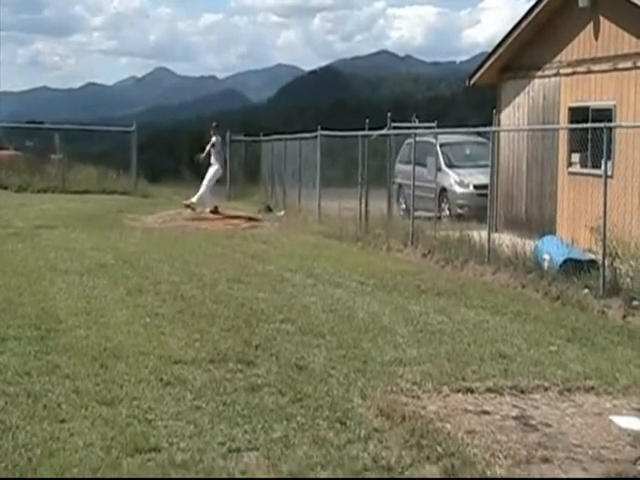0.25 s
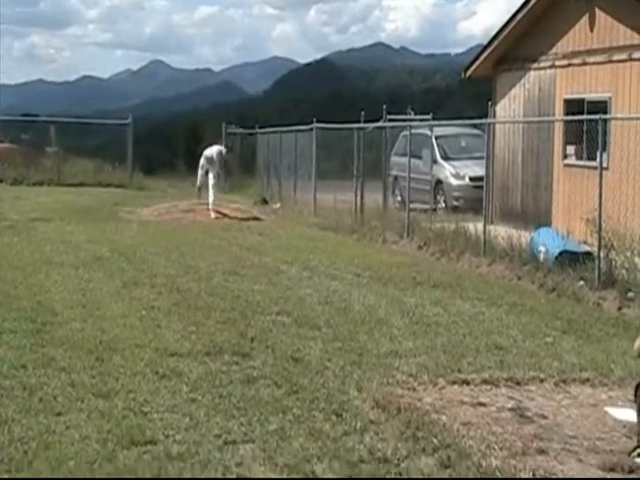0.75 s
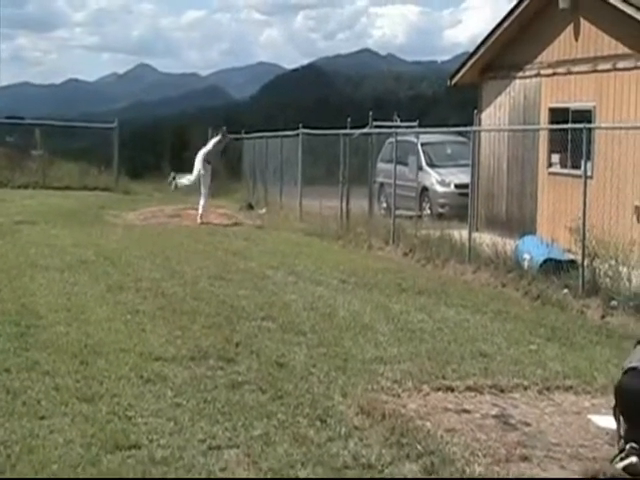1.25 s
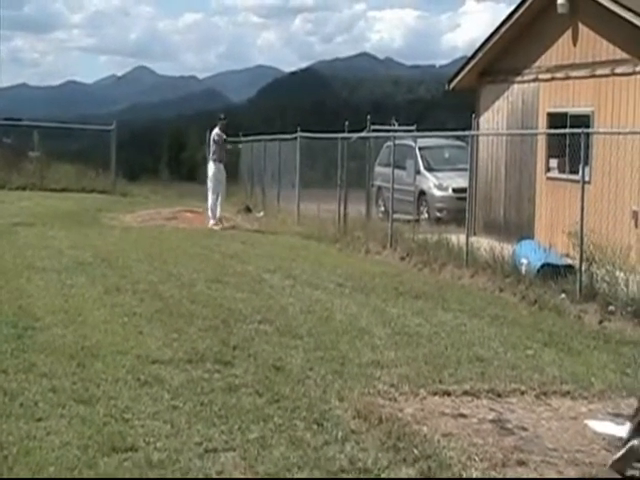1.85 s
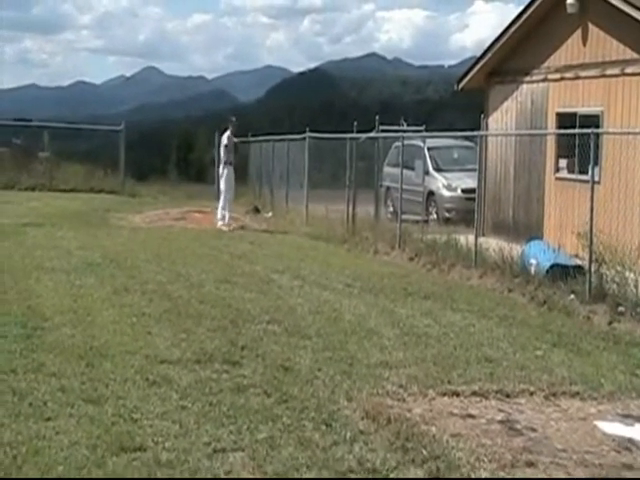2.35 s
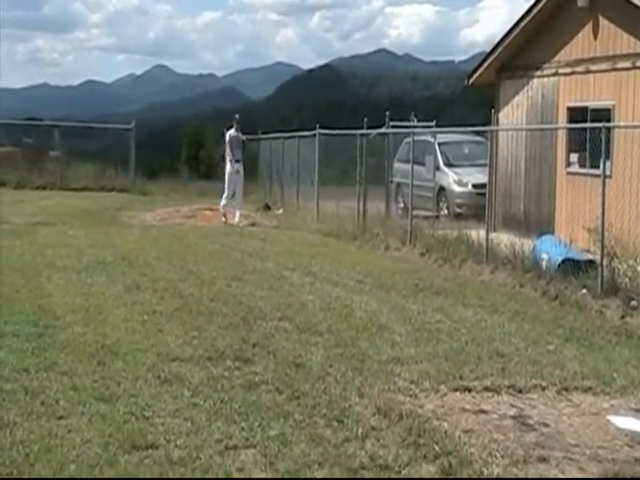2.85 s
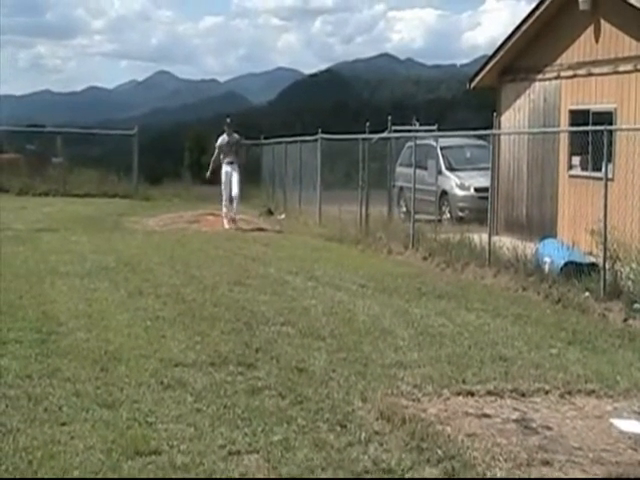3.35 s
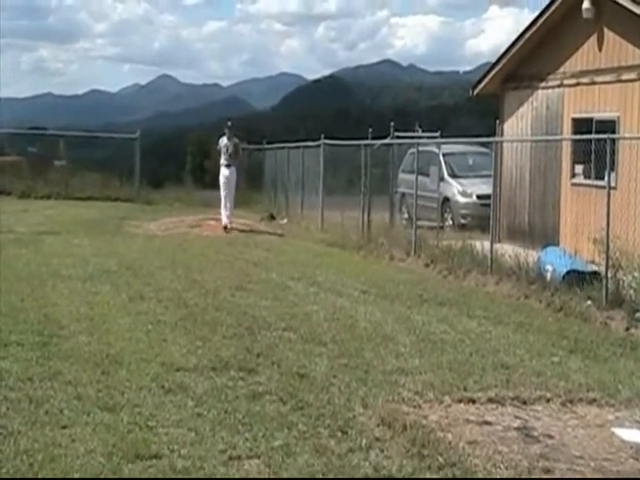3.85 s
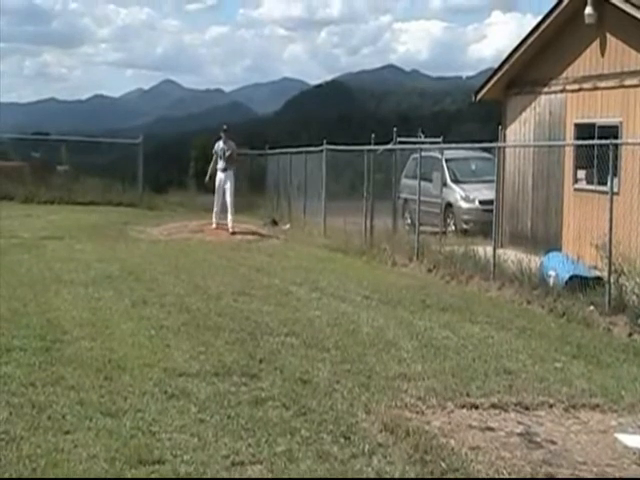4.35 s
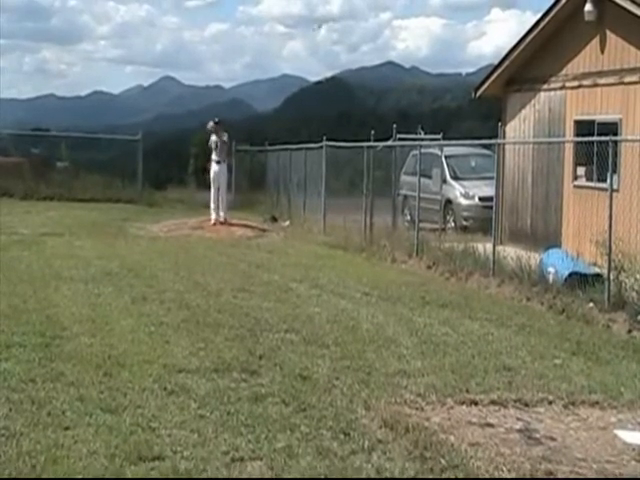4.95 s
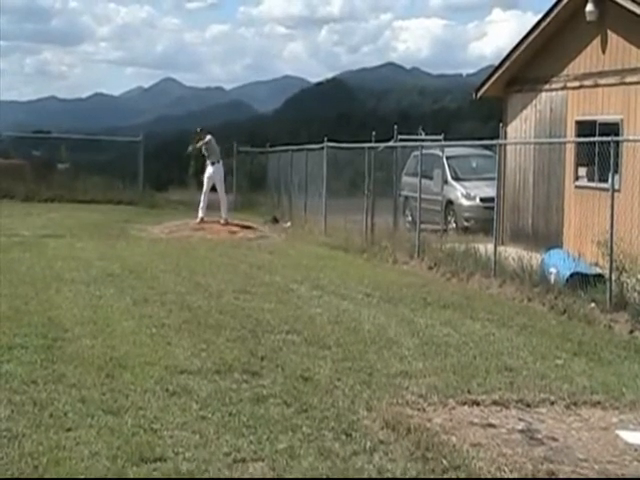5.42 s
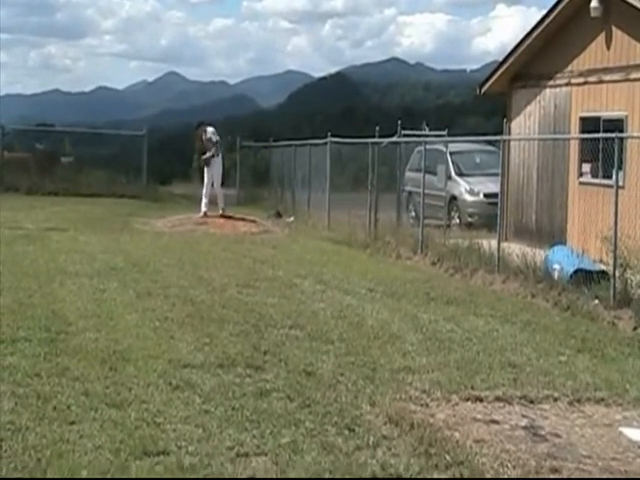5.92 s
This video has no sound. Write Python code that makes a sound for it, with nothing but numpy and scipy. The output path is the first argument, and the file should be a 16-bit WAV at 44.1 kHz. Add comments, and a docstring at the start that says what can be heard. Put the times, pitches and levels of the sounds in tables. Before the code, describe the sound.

An open field in a light breeze, heard on a small camera's slightly dull stereo microphone. From the start a distant engine hums steadily around a low-mid pitch, creeping upward, with thin high cricket trills and a fine ticking insect behind it. A faint scuff comes at 0.85 s. At 1.28 s a ball smacks into a leather mitt close by, very loud and full, with a sharp crack and a short scattered tail; crackling leather and gear snaps run until about 1.45 s. Soft shuffles and rustles follow at 1.7, 2.0 and 3.8 s, with low wind gusts, strongest near 2 s. From about 3 s the drone grows and pulses in slow beats. At 5.6 s a drier, tighter glove pop is doubled immediately by a wall slap. Around 6 s the engine lets off, its pitch sinking, and a soft low knock at 6.14 s, on the left, closes.

```python
"""On a country field, a pitched ball pops into a catcher's mitt: thumping modes, noise crack, scattered tail.
Leather and gear crackle in decaying bursts as the catcher rises; a drier glove pop meets a shed-wall slap.
A far engine drones as a beating sine with faint exhaust lines, slowly speeds up and lets off.
Crickets trill as trains of bent tone bursts; shaped noise makes the shuffles, and the breeze on two ports.
A soft knock of damped modes ends the scene."""
import sys
import numpy as np
from scipy.fft import rfft, irfft, next_fast_len
from scipy.io import wavfile
from scipy.ndimage import map_coordinates

SR = 44100
rng = np.random.default_rng(int(sys.argv[2]) if len(sys.argv) > 2 else 0)


def waveform_to_disk(signal):
    """Save audio, clipped to [-1, 1], as 16-bit WAV at the path in sys.argv[1]."""
    frames = np.transpose(np.atleast_2d(signal))
    scaled = np.clip(frames, -1, 1) * 32767
    samples = np.round(scaled).astype(np.int16)
    wavfile.write(sys.argv[1], SR, samples)


N = 272755


def amp(db):
    """Level to amplitude: 20 dB is a factor of ten."""
    return 10 ** (np.asarray(db) / 20)


def unit(x):
    """Normalize the signal power: scale to rms 1."""
    return x / np.sqrt(np.mean(x ** 2) + 1e-20)


def clock():
    """Uniform sampling: the time of every sample in seconds."""
    return np.arange(N) / SR


def curve(rows):
    """Linear interpolation of (time [s], value) rows."""
    times, values = np.transpose(rows)
    return np.interp(clock(), times, values)


def along(points, hz):
    """Interpolation of (frequency [Hz], value) points on a logarithmic frequency axis."""
    f, v = np.transpose(points)
    return np.interp(np.log(hz + 1), np.log(f), v)


def wobble(rate):
    """Band-limited fluctuation: a smooth curve through random knots, rate of them a second."""
    knots = rng.standard_normal(int(N * rate / SR) + 4)
    return map_coordinates(knots, [clock() * rate])


def filtered(x, response):
    """Linear filtering: the spectrum is multiplied by a zero-phase frequency response."""
    size = next_fast_len(x.shape[-1] + 8192)  # padding limits wrap-around
    hz = np.fft.rfftfreq(size, 1 / SR)
    return irfft(rfft(x, size) * response(hz), size)[..., :x.shape[-1]]


def bell(hz, centre_hz, octaves):
    """Resonance-shaped hump on a log-frequency axis, at half height the given octaves from its centre."""
    return 1 / (1 + (np.log2((hz + 1) / centre_hz) / octaves) ** 2)


def noise(spectrum, side):
    """Mid-side stereo noise of rms 1: (frequency [Hz], level [dB]) for colour, then for side over mid."""
    mid, wide = filtered(rng.standard_normal((2, N)), lambda hz: amp(along(spectrum, hz)))
    wide = filtered(wide, lambda hz: amp(along(side, hz)))
    return unit(np.array([mid + wide, mid - wide]))


def panned(x, left_db):
    """Level-difference localization: left_db is the level of left over right."""
    return x * amp([[left_db / 2], [-left_db / 2]])


def add(track, s, sound):
    """Superposition: sum a short sound into the track at time s."""
    part = track[round(s * SR):][:len(sound)]
    part += sound[:len(part)]


def thump(modes):
    """Modal impact: each mode swells while the contact lasts and is choked as it ends."""
    t = np.arange(SR // 20) / SR
    out = np.zeros(len(t))
    for hz, db, swell in modes:
        envelope = t / swell * np.exp((1 - (t / swell) ** 2) / 2)  # peaks at 1 when t = swell
        out += amp(db) * envelope * np.sin(2 * np.pi * hz * t)
    return out


def burst(t60, attack):
    """Transient envelope: a fast rise and an exponential decay of 60 dB in t60 seconds."""
    t = np.arange(SR // 4) / SR
    return (1 - np.exp(-t / attack)) * np.exp(-np.log(1000) * t / t60)


def beating():
    """Interference: gain of two close tones that drift in and out of step, ever more slowly."""
    # share of the second tone: (time [s], amplitude ratio [0-1])
    beat_depth = [(2.3, 0.01), (4.1, 0.56), (5.25, 0.7), (5.8, 0.08)]
    null_s, null_hz, slowing_hz_per_s = 5.25, 1.53, .32  # deepest dip, beat rate there, its decline
    t = clock() - null_s
    beats = null_hz * t - slowing_hz_per_s * t ** 2 / 2
    return np.abs(1 - curve(beat_depth) * np.exp(2j * np.pi * beats))


def engine():
    """Periodic combustion: a firing tone beats as it grows, and uneven cylinders add wavering lines."""
    # engine speed: (time [s], firing rate [Hz])
    engine_speed = [(0, 142.3), (1.3, 146.5), (2.5, 150.8), (3.6, 153.8), (4.7, 155.9), (5.93, 157.3),
                    (6.02, 147.5), (6.07, 132.2), (6.18, 107.7)]
    # drone before flutter and beating: (time [s], level [dB])
    engine_level = [(0, -31.5), (.4, -25), (1.6, -26), (2.3, -24.5), (2.6, -30), (3.55, -28), (4.35, -22),
                    (5, -20.5), (6.02, -24), (6.1, -34)]
    # faint exhaust lines: (multiple of the firing rate, level before load [dB], left over right [dB])
    exhaust = [(.5, -46, -0.5), (.75, -40, -2), (1.25, -44, -1), (1.5, -48.5, 3), (1.75, -47.5, 1),
               (2, -59, -1), (3.25, -59, 3.5), (6.25, -65.5, -3), (6.75, -62.5, -7.5)]
    # engine load heard on those lines: (time [s], gain [dB])
    engine_load = [(0, -3), (2.1, -3), (2.9, -2.5), (4.8, 1.5), (5.4, -10.5), (6.18, -19)]
    flutter_db = 0.72  # moving air makes the far drone unsteady
    phase = 2 * np.pi * np.cumsum(curve(engine_speed)) / SR
    swell = amp(curve(engine_level) + flutter_db * wobble(28)) * beating()
    out = panned(swell * unit(np.sin(phase)), left_db=-0.64)
    for order, db, left_db in exhaust:
        order = round(order * 4) / 4  # lines lie on quarter multiples
        tone = np.sin(order * phase + 1.1 * wobble(7))
        line = unit(amp(3.0 * wobble(6)) * tone)
        out += panned(amp(db + curve(engine_load)) * line, left_db)
    return out


def wing_strokes(rate, scatter, length, top_hz, crest, droop, size_db, port_phase):
    """Stridulation: each stroke scrapes a tone on a pitch arch topped at crest, sagging as the wing slows."""
    u = np.linspace(0, 1, int(length * SR))  # progress through a stroke; length in seconds
    pitch = top_hz * (1 - droop * (u - crest) ** 2)
    song = np.zeros(N, complex)
    strokes = rng.standard_normal((int(rate * N / SR) + 1, 3))
    for k, (late, size, detune) in enumerate(strokes):
        phase = 2 * np.pi * np.cumsum(pitch * (1 + .002 * detune)) / SR
        stroke = amp(size_db * size) * np.sin(np.pi * u) * np.exp(1j * phase)
        start = max(0, (k + .5 + scatter * late) / rate)
        add(song, start, stroke)
    # such short waves reach the two ports out of step
    shifted = song * np.exp(1j * port_phase)
    return unit(np.array([song.real, shifted.real]))


def bouts():
    """Amplitude modulation: the bush cricket swells about once a second, unevenly, and rests once."""
    level_db, swing_db = -63, 1.5
    peak_s, period_s = 3.96, 1
    rest_s, rest_spread_s, rest_db = 0.68, .13, -19
    swell = swing_db * np.cos(2 * np.pi * (clock() - peak_s) / period_s)
    rest = rest_db * np.exp(-((clock() - rest_s) / rest_spread_s) ** 2 / 2)
    return amp(level_db + swell + rest + 1.4 * wobble(5.6))


def insects():
    """Stridulating sources: two crickets trill at unlike rates over a far chorus; a bush cricket ticks."""
    near = wing_strokes(rate=18.52, scatter=.012, length=.02, top_hz=8785,
                        crest=.42, droop=.1, size_db=1, port_phase=1.9)
    far = wing_strokes(rate=17.8, scatter=.05, length=.026, top_hz=8420,
                       crest=.3, droop=.13, size_db=2.5, port_phase=1.6)
    # a crest before the stroke begins makes the pitch only fall
    ticks = wing_strokes(rate=61, scatter=0.2, length=0.0069, top_hz=7504,
                         crest=-0.35, droop=.045, size_db=2.5, port_phase=0.91)
    chorus = noise([(6500, -35.5), (7300, -8.5), (8300, 2), (8700, -5.5), (9100, -22),
                    (10500, -31.5), (12000, -44.5)], [(8000, 0.84)])
    crickets = panned(amp(-56.8) * near, left_db=-2) + panned(amp(-62.5) * far, left_db=3)
    return crickets + bouts() * ticks + amp(-62) * chorus


def breeze():
    """Turbulence: a soft rush from the far trees, and low gusty lumps of wind unlike at the two ports."""
    # wind strength at the ports before gusts: (time [s], level [dB])
    wind_level = [(0, -40), (.9, -34), (1.62, -30.5), (1.85, -36), (2.05, -27), (2.55, -37), (2.8, -42),
                  (3.2, -39.5), (3.45, -31.5), (3.96, -51.5), (4.2, -32.5), (5.1, -34), (5.7, -28.5),
                  (6.15, -31)]
    # colour of the wind lumps: (frequency [Hz], relative level per Hz [dB])
    buffet = [(20, -17), (40, -7.5), (80, -5.5), (130, -3.5), (200, -8), (300, -24), (500, -33.5),
              (1200, -63.5)]
    # colour of the rush of trees: (frequency [Hz], relative level per Hz [dB])
    air = [(60, -5.5), (300, 6.5), (430, -0.5), (560, -3.5), (720, 0), (1020, -2), (1200, -6), (1800, -9),
           (2600, -16), (3800, -23), (4500, -21.5), (5700, -29.5), (9000, -22.5), (10800, -37.5),
           (13200, -45)]
    # stereo width of the rush: (frequency [Hz], side over mid [dB])
    air_side = [(200, -2.5), (800, -9), (2000, -9.5), (5000, -4), (9000, -0.5), (13000, -5)]
    field_db, gust_db = -42, 1  # rush level about which it drifts; size of the random gusts
    drift = 0.48 * wobble(8) + 1.5 * wobble(0.97)
    rush = amp(field_db + drift) * noise(air, air_side)
    lumps = noise(buffet, [(30, 1.7), (70, 0.86), (140, 1.4), (250, 0.36)])
    gusts = amp(curve(wind_level) + gust_db * wobble(9))
    return rush + panned(gusts * lumps, left_db=5.5)


def scuffs():
    """Friction noise: each shuffle is a short swell of grain, and fainter rustles come and go at random."""
    # clearest shuffles of shoes, grass and kit:
    # (time [s], level [dB], Gaussian spread [s], brightest frequency [Hz], half width [octaves])
    shuffles = [(0.849, -49.5, 0.012, 2690, 0.88), (1.688, -51, 0.032, 2880, 0.15),
                (2.016, -51, 0.011, 3900, 0.91), (2.313, -57, 0.017, 6440, 1), (2.885, -58, 0.037, 6500, 1),
                (3.323, -62, 0.05, 4440, 0.19), (3.817, -48.5, 0.013, 1790, 0.28),
                (3.888, -60, 0.024, 9400, .4)]
    rustle_db, rustle_swing_db, rustle_hz = -66.5, 2, 4500
    grain = amp(2.5 * wobble(300))
    grit = grain * noise([(8500, 0.5), (11000, -6.5), (13500, -13)], [(1000, -13.5)])

    def rub(bright_hz, octaves):
        """Spectral shaping: the grit is brightest around one frequency."""
        return unit(filtered(grit, lambda hz: bell(hz, bright_hz, octaves)))

    out = amp(rustle_db) * unit(amp(rustle_swing_db * wobble(5)) * rub(rustle_hz, 1))
    for s, db, spread, bright_hz, octaves in shuffles:
        swell = np.exp(-((clock() - s) / spread) ** 2 / 2)
        out += amp(db) * swell * rub(bright_hz, octaves)
    return out


def pop(contacts, modes, crack_t60, tail_db, tail_t60):
    """Impact and scattering: pocket thumps, leather face cracks, grass and fence scatter a short tail."""
    # colour of the crack: (frequency [Hz], relative level per Hz [dB])
    crack_colour = [(200, -16), (900, -7.5), (2200, 2), (3500, 2.5), (4100, -11.5), (4900, -8), (5400, 2),
                    (6600, -8), (7700, -2), (9500, -23), (11800, -23), (13500, -37.5)]
    pocket, crack, tail = np.zeros((3, N))
    for s, thump_db, crack_db in contacts:
        add(pocket, s, amp(thump_db) * thump(modes))
        add(crack, s, amp(crack_db) * burst(crack_t60, attack=.00018))
        add(tail, s, amp(thump_db + tail_db) * burst(tail_t60, attack=0.00057))
    face = noise(crack_colour, [(1000, -1), (8000, -8)])
    scatter = noise([(200, 3.5), (800, 1), (2800, -6.5), (4300, -16.5), (8000, -18.0), (13000, -41.0)],
                    [(1000, -11.5)])
    return pocket + crack * face + tail * scatter


def crackle():
    """Stick-slip release: stiff leather and gear snap over a fine crackle, with ringing and gritty ticks."""
    # fine crackle as the mitt flexes, before roughness: (time [s], level [dB])
    flexing = [(1.283, -70), (1.290, -37.5), (1.326, -45), (1.333, -34.5), (1.350, -34.5), (1.39, -44.5),
               (1.45, -72)]
    # loudest snaps of leather and gear: (time [s], leather level [dB], grit level [dB])
    snaps = [(1.2984, -24, -16), (1.3026, -25.5, -24.5), (1.3118, -19.5, -31), (1.3285, -18, -20.5),
             (1.335, -29, -22), (1.359, -30, -38), (1.366, -25.5, -40)]
    # leather resonances: (frequency [Hz], width at half amplitude [Hz], relative level [dB])
    leather = [(1400, 400, -8), (2150, 550, 0), (3050, 550, 0)]
    # colour of the ticks: (frequency [Hz], relative level per Hz [dB])
    grit_colour = [(300, -1), (1200, -1), (3000, -27), (4100, -3), (5300, 0.5), (6400, -4), (7500, -1.5),
                   (9500, -10), (11500, -34.5)]
    snap_t60 = 0.0082  # s
    flex_grit_db, flex_rough_db = -5, 3.5  # grit over leather; unevenness of the fine crackle
    active = (clock() > flexing[0][0]) * (clock() < flexing[-1][0])
    flex = amp(curve(flexing) + flex_rough_db * wobble(400)) * active
    tick = amp(flex_grit_db) * flex
    for s, leather_db, grit_db in snaps:
        add(flex, s, amp(leather_db) * burst(snap_t60, attack=.0003))
        add(tick, s, amp(grit_db) * burst(snap_t60, attack=0.00036))

    def hide(f):
        """Resonance: the summed amplitude peaks of the leather."""
        return sum(amp(db) / (1 + (2 * (f - hz) / width) ** 2) for hz, width, db in leather)

    ring = unit(filtered(noise([(1000, 0)], [(1000, -14.5)]), hide))
    grit = unit(amp(0.89 * wobble(1100)) * noise(grit_colour, [(1000, -22), (8000, -9.5)]))
    return flex * ring + tick * grit


def bump():
    """Structure-borne impact: a hand knocks the camera body and its damped modes sound."""
    # soft knock: (time [s], level [dB])
    knocks = [(6.1429, -18)]
    # modes of the body: (frequency [Hz], relative level [dB], swell time [s])
    body = [(110, -0.5, 0.0046), (270, -9, 0.0032)]
    out = np.zeros(N)
    for s, db in knocks:
        add(out, s, -amp(db) * thump(body))
    return panned(out, left_db=-15.5)


def scene():
    """Superposition of all sources; the catcher crouches just right of the camera."""
    # ball into the mitt, rim then pocket: (time [s], thump level [dB], crack level [dB])
    catch_contacts = [(1.2752, -24, -20), (1.2760, 0, -9.5)]
    # ball into a fielding glove, then its slap off the shed wall:
    # (time [s], thump level [dB], crack level [dB])
    return_contacts = [(5.5925, 0.5, -16.5), (5.6060, 1.3, -23)]
    # leather modes of the mitt: (frequency [Hz], relative level [dB], swell time [s])
    mitt = [(356, -13.5, 0.0046), (713, -5.5, 0.0036), (1240, -9.5, 0.0021), (2040, -15.5, 0.0026),
            (2820, -17.5, 0.0011), (3400, -25.5, 0.0022)]
    # leather modes of the glove: (frequency [Hz], relative level [dB], swell time [s])
    glove = [(700, -27, 0.0013), (940, -5, 0.001), (1275, -12.5, 0.00093), (2480, -15.5, 0.00076),
             (2754, -18, 0.00086), (3360, -20.5, 0.0014)]
    background = engine() + insects() + breeze() + scuffs()
    catch = pop(catch_contacts, mitt, crack_t60=.012, tail_db=-31, tail_t60=.1) + crackle()
    back = pop(return_contacts, glove, crack_t60=0.0091, tail_db=-21.5, tail_t60=0.044)
    return background + panned(catch, left_db=-1) + panned(back, left_db=-1.0) + bump()


def record(dry):
    """Saturation and band limiting: the camera clips at full scale and keeps nothing above its top."""
    top_hz = 13900
    return filtered(np.clip(dry, -1, 1), lambda hz: hz < top_hz)


dry = scene()
out = record(dry)
waveform_to_disk(out)
```